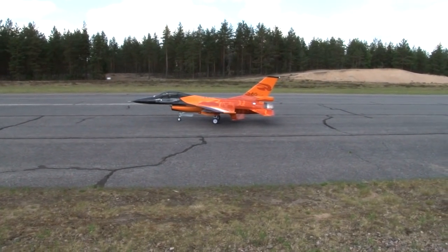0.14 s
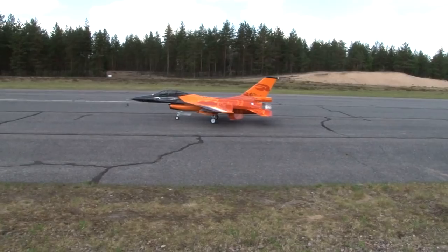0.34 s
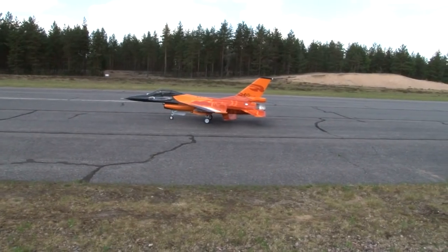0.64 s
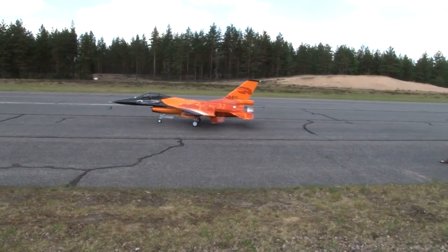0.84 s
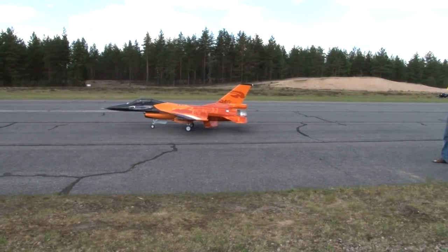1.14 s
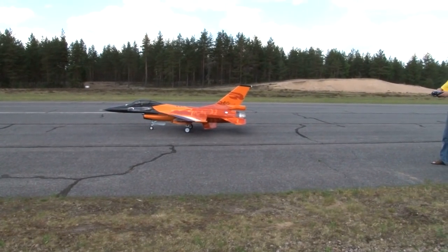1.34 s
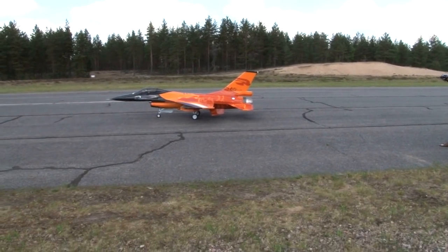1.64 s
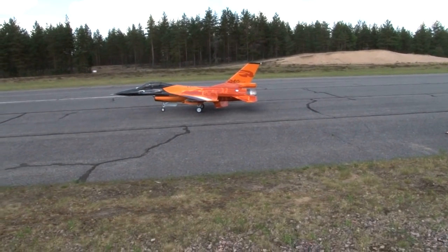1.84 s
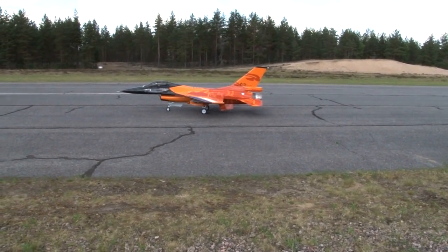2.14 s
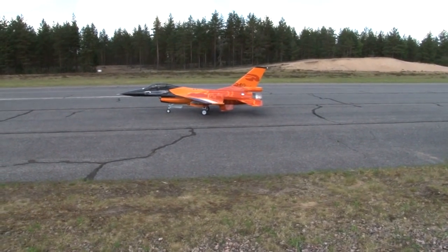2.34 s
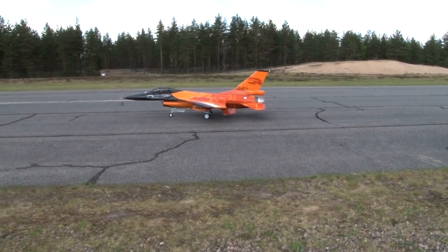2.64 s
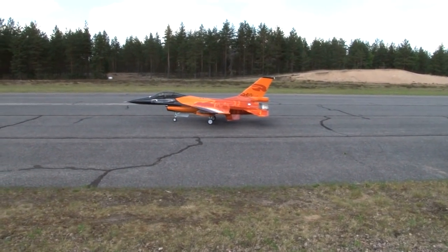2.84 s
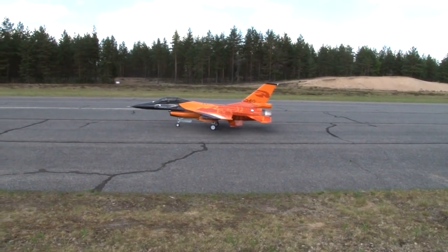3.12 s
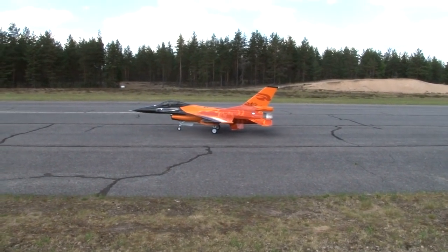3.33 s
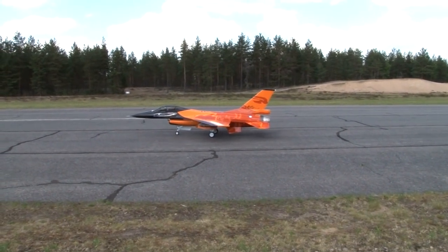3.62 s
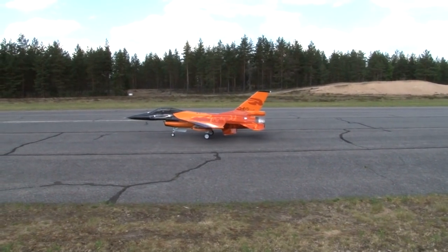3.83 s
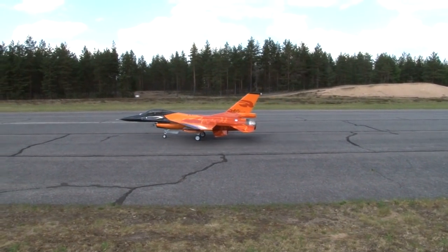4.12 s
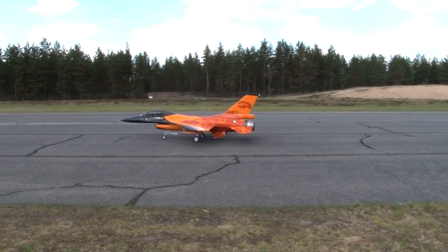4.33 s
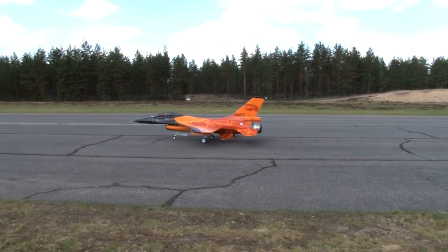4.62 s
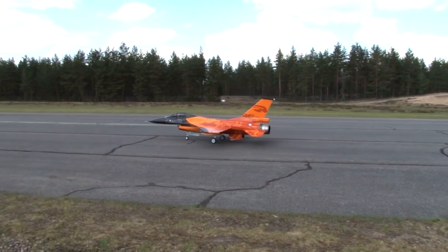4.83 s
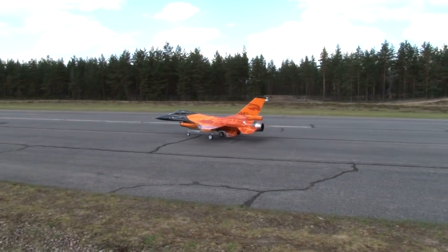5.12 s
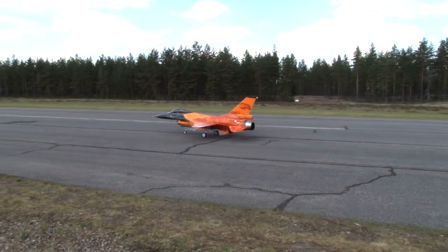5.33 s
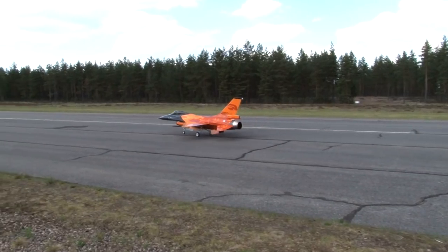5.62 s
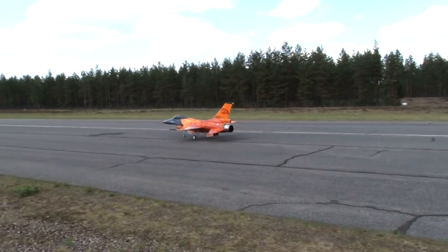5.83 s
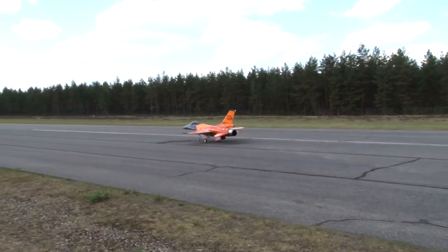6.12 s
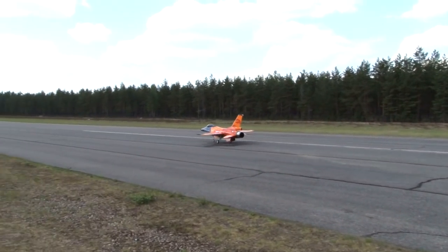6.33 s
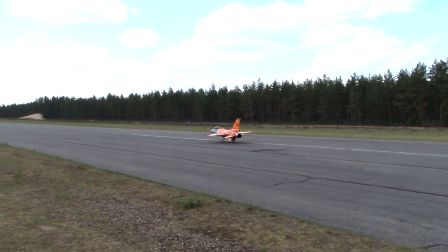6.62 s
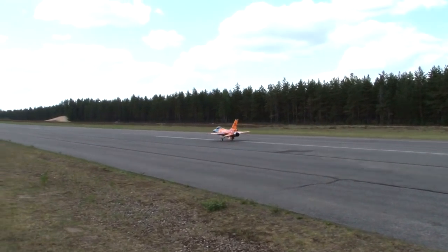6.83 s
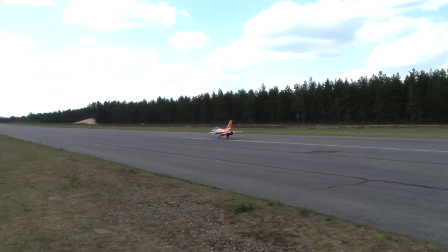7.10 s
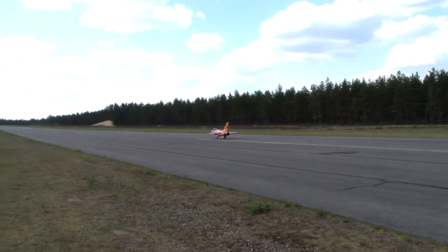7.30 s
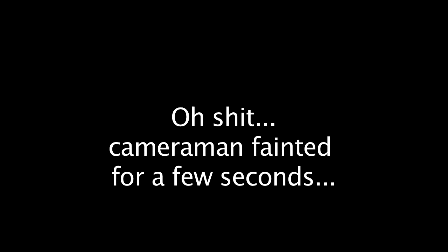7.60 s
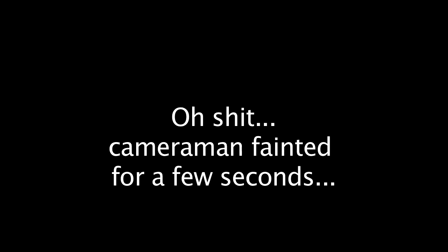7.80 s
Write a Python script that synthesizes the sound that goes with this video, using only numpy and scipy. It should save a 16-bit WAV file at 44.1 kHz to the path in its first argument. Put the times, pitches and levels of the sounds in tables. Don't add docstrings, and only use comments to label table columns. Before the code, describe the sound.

Model jet engine on a runway: quiet hissy idle, climbing compressor whine, swelling rushing roar that overloads the microphone, then sudden silence.

```python
import sys
import numpy as np
from scipy import signal
from scipy.io import wavfile
from scipy.ndimage import uniform_filter1d

SR = 44100
rng = np.random.default_rng(int(sys.argv[2]) if len(sys.argv) > 2 else 0)


def unload_audio(sound):
    columns = np.transpose(np.atleast_2d(sound))
    steps = np.round(np.clip(columns, -1, 1) * 32767)
    wavfile.write(sys.argv[1], SR, steps.astype(np.int16))


def ratio(d):
    e = np.asarray(d, float) / 20
    return 10 ** e


N = 351036

# start_s, fuel_0_1, thrust_0_1, gust_db
ENGINE = [(0, 0.02, 0, 0), (1.1, 0.09, 0.01, -1), (1.58, 0.47, 0.16, -0.5), (2.0, 0.75, 0.4, -1.5),
          (2.6, 0.82, 0.43, 0), (3.12, 0.71, 0.49, 1.5), (3.4, 0.68, 0.59, 1), (3.75, 0.86, 0.71, 1),
          (4.1, 0.87, 0.88, 0.5), (4.45, 1, .99, 0), (5.1, 0.83, 1, -.6), (5.6, 0.67, 0.8, 2.6),
          (5.95, 0.86, 0.88, .8), (6.4, 1, 1, -1.5), (6.7, 1, 0.98, -0.6), (6.9, .99, 0.87, -0.6),
          (7.2, 0.83, 0.9, 1), (7.57, 0.89, 0.98, -1)]
GAINS = {"rumble": (-30.5, 16.5, 1, 0.5, -3.5), "roar": (-33.5, 0, 21.5, 0, -0.5),
         "nozzle": (-38.5, 0.5, 10.5, 11, 1), "intake": (-29, 4.5, 7, 12.5, 0.5),
         "pipe": (-25.5, 1, 9, 2, 0.5), "chamber": (-10.5, 16.5, 0, -13.5, -15.5),
         "wake": (-31, 0.5, 1, -1, -2), "screech": (-31, 0, 20, 14, 0), "buffet": (-69.5, 2.5, -2.5, 22, 3)}
BEAMS = {"rumble": (24.7, 11.6, 7.7, 0.66), "roar": (31.6, 8.3, 4, 0.22), "nozzle": (27.7, 12, 7.9, 0.9),
         "intake": (23.7, 9, 5, 1.015), "pipe": (25, 13, 19, 0.2), "chamber": (24, 3.2, 19, 0.86),
         "wake": (21.9, 18, 36.4, .05), "screech": (42, 8.1, 3.7, 0.86), "buffet": (40, 10, 9, 1.4)}

# pitch_hz, level_db (per Hz)
RUMBLE = [(90, -28), (140, -10), (220, -2.5), (500, 2), (800, 0.5), (1100, -6.5), (1500, -15)]
ROAR = [(800, -4.5), (1200, -4), (1800, -3.5), (2500, -3), (3300, -3), (3900, -11)]
NOZZLE = [(3000, -20), (3600, 4.5), (4200, -3), (4900, -3.5), (5600, -11.5)]
INTAKE = [(4500, -16.5), (5300, -2), (6300, 1.5), (7400, 0.5), (8200, 1.5), (9100, -6.5)]
# pitch_hz, level_db (per Hz)
BLAST = [(20, -1), (35, -1.5), (55, -4), (85, -6), (130, -1.5), (250, -8.5), (420, -12)]
# pitch_hz, level_db
SPREAD = [(60, 1.5), (180, -4), (500, -3.5), (1400, 1.5), (2000, -1), (2450, 2.5), (2900, -1.5), (3500, -5),
          (4100, 0), (4600, 3), (5000, 0), (5350, 2), (6000, 4.5), (9000, -12)]

# pitch_hz, width_hz, level_db
DUCT = [(3400, 130, -44), (6100, 260, -39), (6380, 200, -38), (6650, 240, -42), (465, 45, -43),
        (950, 80, -44)]
# pitch_hz, width_hz, level_db
CHAMBER = [(211.5, 74, -32.5), (480, 92, -32.5), (590, 94, -28.5)]
# start_s, pitch_hz, level_db
WHINE = [
    (0, 6845, -45),
    (1.2, 6855, -43),
    (1.5, 7070, -38),
    (1.68, 7310, -30),
    (1.8, 7520, -37),
    (2.0, 7930, -39),
    (2.3, 8660, -30),
    (2.4, 8900, -26),
    (2.47, 9050, -27),
]
# start_s, pitch_hz, level_db
ROTOR = [
    (2.9, 5250, -60),
    (3.2, 5500, -46),
    (3.6, 6050, -45),
    (4.0, 6750, -42),
    (4.4, 7300, -50),
]
# pitch_hz, width_hz, level_db
PIPE = [(4110, 170, -27)]
# pitch_hz, width_hz, level_db
SCREECH = [(5230, 700, -24), (5940, 710, -20.5)]
# pitch_hz, width_hz, level_db
WAKE = [(1055, 240, -28), (1490, 740, -21)]

# pitch_hz, width_hz, level_db
HOUSING = [(215, 90, 1), (315, 80, -12), (470, 60, 4), (790, 110, -6), (990, 190, 4), (1150, 150, -3),
           (2250, 200, 2), (2620, 200, -2), (3200, 250, 3), (3750, 300, -5), (4100, 260, 3),
           (4650, 300, -3), (5250, 300, 3), (3545, 70, -17)]
# pitch_hz, level_db
ENDS = [(15, -8.5), (35, -9.5), (60, 0), (7400, 0), (8100, -2.5), (8600, -7), (9000, -12)]
# pitch_hz, level_db
FAINTEST = [(100, -90), (3000, -74), (7800, -67), (8400, -62), (8700, -56.5), (9000, -51.5)]
# pitch_hz, level_db
SIDE_KEPT = [(100, -35), (550, -28), (900, -14), (2000, -10.5), (5000, -11), (5450, -13.5), (5600, 19)]

ABEAM_M, START_M, ROLL_S, ACCEL_M_S2 = 8, 0.5, 3.0, 3.0
BEHIND_DEG, BEHIND_EDGE_DEG = 73.1, 4.7
BLAST_DEG, BLAST_WIDTH_DEG = 48, 17.4
DUCT_DB, DUCT_QUITS_THRUST, DUCT_LOSS_DB = 2, 0.41, 198
NOTCH_HZ, NOTCH_CLIMB, ECHO_SHARE = 1268, 0.59, 0.44
WIDE_DB, WIDE_FUEL_DB, WIDE_BLAST_DB, WIDE_FAR = -12, -5, -2.5, 0.31
BYPASS_BLAST, BYPASS_BEHIND, BYPASS_FUEL = 0.27, 0.04, 0.04
LEAN_HZ = 905
LEAN_DB, LEAN_FUEL_DB, LEAN_BEHIND_DB, LEAN_BLAST_DB = -1.9, -0.7, 1.5, 1.7
CEILING, CAUGHT_S, OVERSHOOT, RECOVER_S, EASE_S, EASE_PER_S = 0.79, 4.2, 0.16, 0.36, 6.35, 0.11
KNEE = 4
CUTOFF_HZ, MASKED_DB = 9100, -10.5
STOP_S, SMEAR_S, SMEAR_HZ, SMEAR_DB = 7.577, 0.06, 1350, -24


def rms_one(x):
    return x / np.sqrt(np.mean(x ** 2) + 1e-20)


def in_time(rows):
    s, *columns = np.transpose(rows)
    return [np.interp(np.arange(N) / SR, s, c) for c in columns]


def at_hz(points, hz):
    table_hz, table_db = np.transpose(points)
    return np.interp(np.log(hz), np.log(table_hz), table_db)


def drift(rate_hz):
    r = np.exp(-80 * np.pi * rate_hz / SR)
    noise = rng.standard_normal(N // 40 + 2002)
    slow = signal.lfilter([1], [1, -2 * r, r * r], noise)[2000:]
    return np.interp(np.arange(N) / 40, np.arange(len(slow)), rms_one(slow))


def jet():
    fuel, thrust, gust_db = in_time(ENGINE)
    rolling_s = np.maximum(np.arange(N) / SR - ROLL_S, 0)
    along_m = START_M + ACCEL_M_S2 / 2 * rolling_s ** 2
    angle = np.degrees(np.arctan2(ABEAM_M, along_m))
    far = np.hypot(ABEAM_M, along_m) / ABEAM_M
    behind = 1 / (1 + np.exp((angle - BEHIND_DEG) / BEHIND_EDGE_DEG))
    blast = np.exp(-((angle - BLAST_DEG) / BLAST_WIDTH_DEG) ** 4)
    return dict(fuel=fuel, thrust=thrust, gust_db=gust_db, angle=angle, far=far, behind=behind, blast=blast)


def heard_db(layer, j):
    idle_db, fuel_db, thrust_db, behind_db, blast_db = GAINS[layer]
    beam_deg, width_deg, beam_db, loss_share = BEAMS[layer]
    made_db = idle_db + fuel_db * j["fuel"] + thrust_db * j["thrust"]
    placed_db = behind_db * j["behind"] + blast_db * j["blast"]
    beamed_db = beam_db * np.exp(-((j["angle"] - beam_deg) / width_deg) ** 2)
    spreading_db = loss_share * 20 * np.log10(j["far"])
    return made_db + placed_db + beamed_db - spreading_db + j["gust_db"]


def turbulence(spectrum, shared_db, own_db, own_rate):
    low_hz, high_hz = spectrum[0][0], spectrum[-1][0]
    edges = np.geomspace(low_hz, high_hz, 2 + int(3 * np.log2(high_hz / low_hz)))
    white = rng.standard_normal((2, 2, N))
    surge, out = drift(1.96), 0
    for k, (low, high) in enumerate(zip(edges, edges[1:])):
        sos = signal.butter(2, [low, high], "band", fs=SR, output="sos")
        band = signal.sosfilt(sos, white[k % 2])
        hz = np.sqrt(low * high)
        band[1] *= ratio(at_hz(SPREAD, hz))
        out = out + band * ratio(at_hz(spectrum, hz) + shared_db * surge + own_db * drift(own_rate))
    return out / np.sqrt(np.mean(out[0] ** 2))


def exhaust(j):
    rumble = turbulence(RUMBLE, shared_db=-0.52, own_db=0.56, own_rate=18.0)
    roar = turbulence(ROAR, shared_db=0.74, own_db=0.05, own_rate=5.2)
    nozzle = turbulence(NOZZLE, shared_db=0.4, own_db=0.7, own_rate=14.0)
    intake = turbulence(INTAKE, shared_db=-0.38, own_db=0.73, own_rate=25.0)
    out = ratio(heard_db("rumble", j) - 0.9) * rumble
    out = out + ratio(heard_db("roar", j) + 0.44) * roar
    out = out + ratio(heard_db("nozzle", j)) * nozzle
    return out + ratio(heard_db("intake", j) - 0.1) * intake


def asphalt(mid_side, j):
    mid, side = mid_side
    notch_hz = NOTCH_HZ * j["far"] ** NOTCH_CLIMB
    strength = ECHO_SHARE * np.clip(j["fuel"], 0, 1)
    dull = signal.sosfiltfilt(signal.butter(1, 3500, fs=SR, output="sos"), mid)
    echo = np.interp(np.arange(N) - SR / (2 * notch_hz), np.arange(N), dull)
    mid = (mid + strength * echo) / np.sqrt(1 + strength ** 2)
    side_db = WIDE_DB + WIDE_FUEL_DB * j["fuel"] + WIDE_BLAST_DB * j["blast"]
    side_db = side_db + WIDE_FAR * 20 * np.log10(j["far"])
    return mid, ratio(side_db) * side


def whistles(modes, level_db):
    out = 0
    for hz, width_hz, db in modes:
        r = np.exp(-np.pi * width_hz / SR)
        once = [1, -2 * r * np.cos(2 * np.pi * hz / SR), r * r]
        ringing = signal.lfilter([1], np.convolve(once, once), rng.standard_normal(N))
        out = out + ratio(db) * rms_one(ringing)
    return out * ratio(level_db)


def duct_whistles(j):
    excess = np.maximum(j["thrust"] - DUCT_QUITS_THRUST, 0)
    return whistles(DUCT, DUCT_DB - DUCT_LOSS_DB * excess)


def blade_tone(rows, wobble_hz, flutter_db):
    hz, level_db = in_time(rows)
    phase = 2 * np.pi * np.cumsum(hz + wobble_hz * drift(40.0)) / SR
    sounding = np.clip((rows[-1][0] - np.arange(N) / SR) * 20, 0, 1)
    return np.sqrt(2) * ratio(level_db + flutter_db * drift(42.0)) * sounding * np.sin(phase)


def jet_resonances(j):
    out = whistles(CHAMBER, heard_db("chamber", j)) + whistles(PIPE, heard_db("pipe", j))
    return out + whistles(WAKE, heard_db("wake", j)) + whistles(SCREECH, heard_db("screech", j))


def buffeting(j):
    wind = turbulence(BLAST, shared_db=-4.0, own_db=-1.5, own_rate=6.0)
    mid, side = ratio(heard_db("buffet", j) + 14.0) * wind
    return mid, ratio(-11.0) * side


def housing(x):
    for hz, width_hz, db in HOUSING:
        a, damp = ratio(db / 2), np.pi * width_hz / SR
        turn = -2 * np.cos(2 * np.pi * hz / SR)
        x = signal.lfilter([1 + damp * a, turn, 1 - damp * a], [1 + damp / a, turn, 1 - damp / a], x)
    return x


def bass_lean(mid, j):
    bass = signal.sosfilt(signal.butter(1, LEAN_HZ, fs=SR, output="sos"), mid)
    lean_db = LEAN_DB + LEAN_FUEL_DB * j["fuel"] + LEAN_BEHIND_DB * j["behind"] + LEAN_BLAST_DB * j["blast"]
    return (ratio(lean_db / 2) - 1) * bass


def scene():
    j = jet()
    mid, side = asphalt(exhaust(j), j)
    mid = mid + duct_whistles(j)
    mid = mid + blade_tone(WHINE, wobble_hz=58, flutter_db=3.5)
    mid = mid + blade_tone(ROTOR, wobble_hz=90, flutter_db=2.0)
    mid = mid + jet_resonances(j)
    mid, side = signal.sosfilt(signal.butter(3, 58, "high", fs=SR, output="sos"), [mid, side])
    bypass = BYPASS_BLAST * j["blast"] + BYPASS_BEHIND * j["behind"] ** 2
    bypass = bypass + BYPASS_FUEL * np.clip(j["fuel"], 0, 1)
    mid = (1 - bypass) * housing(mid) + bypass * mid
    wind_mid, wind_side = buffeting(j)
    mid, side = mid + wind_mid, side + wind_side
    side = side + bass_lean(mid, j)
    return np.array([mid + side, mid - side])


def overload(x):
    s = np.arange(N) / SR
    caught = OVERSHOOT * (s > CAUGHT_S) * np.exp(-abs(s - CAUGHT_S) / RECOVER_S)
    top = CEILING + caught - EASE_PER_S * np.maximum(s - EASE_S, 0)
    return x / (1 + np.abs(x / top) ** KNEE) ** (1 / KNEE)


def thin_cells(x):
    mid_side = [(x[0] + x[1]) / 2, (x[0] - x[1]) / 2]
    hz, _, (m, s) = signal.stft(mid_side, SR, nperseg=2048, noverlap=1536)
    m, s = [m, s] * (ratio(at_hz(ENDS, hz + 1)) * (hz < CUTOFF_HZ))[:, None]
    lasting = uniform_filter1d(abs(np.array([m, s])) ** 2, size=5, axis=2)
    cell = np.minimum(np.arange(len(hz)) // 6 * 6 + 3, len(hz) - 1)
    m_power, s_power = uniform_filter1d(lasting, size=6, axis=1)[:, cell]
    fine = uniform_filter1d(lasting[0], size=3, axis=0)
    wide = uniform_filter1d(lasting[0], size=30, axis=0)
    masked = (fine < ratio(2 * MASKED_DB) * wide) & (hz > 3000)[:, None]
    m = m * (m_power > ratio(2 * at_hz(FAINTEST, hz + 1))[:, None]) * ~masked
    s = s * (s_power > ratio(2 * at_hz(SIDE_KEPT, hz + 1))[:, None] * m_power)
    mid, side = signal.istft([m, s], SR, nperseg=2048, noverlap=1536)[1][:, :N]
    return np.array([mid + side, mid - side])


def abrupt_stop(x):
    after_s = np.arange(N) / SR - STOP_S
    low = signal.sosfilt(signal.ellip(6, 1, 60, [60, SMEAR_HZ], "band", fs=SR, output="sos"), x)
    smear = ratio(SMEAR_DB) * np.clip((SMEAR_S - after_s) * 60, 0, 1) * low
    trace = ratio(-22 - 5000 * np.maximum(after_s, 0)) * x
    return np.where(after_s < 0, x, smear + trace)


def top_cut(x):
    return signal.sosfilt(signal.butter(12, 8850, fs=SR, output="sos"), x)


def record(dry):
    x = overload(ratio(0.67) * dry)
    x = thin_cells(x)
    x = abrupt_stop(x)
    return top_cut(x)


dry = scene()
out = record(dry)
unload_audio(out)
```